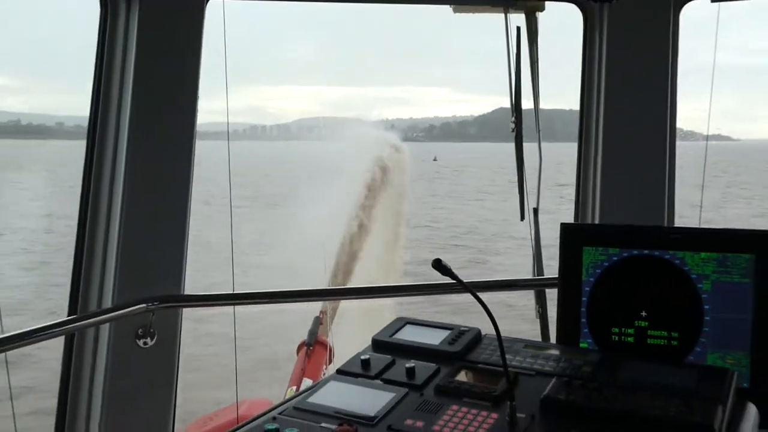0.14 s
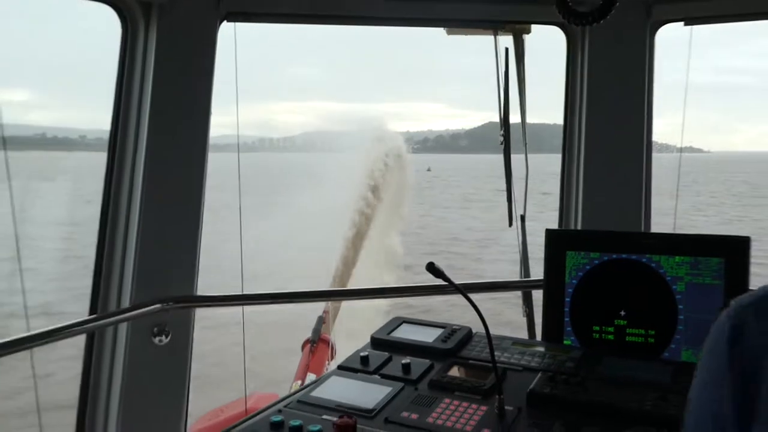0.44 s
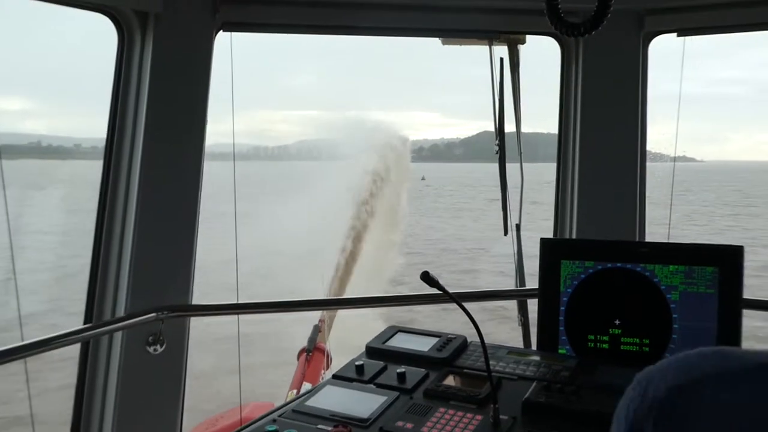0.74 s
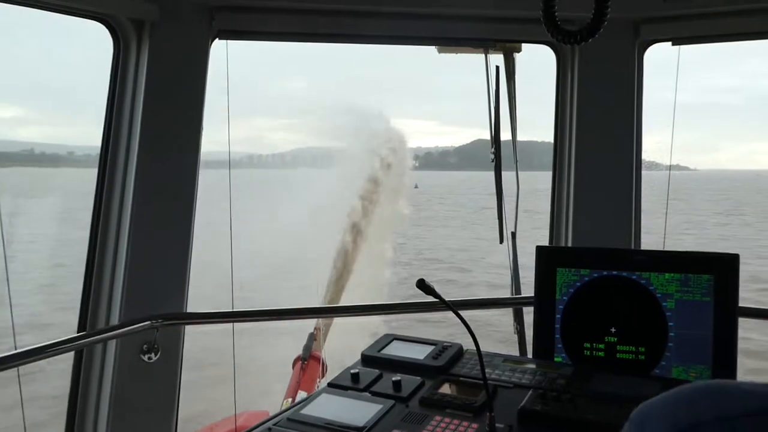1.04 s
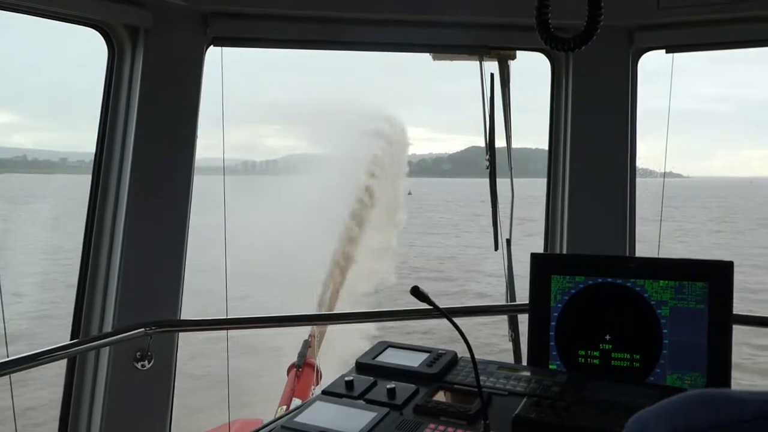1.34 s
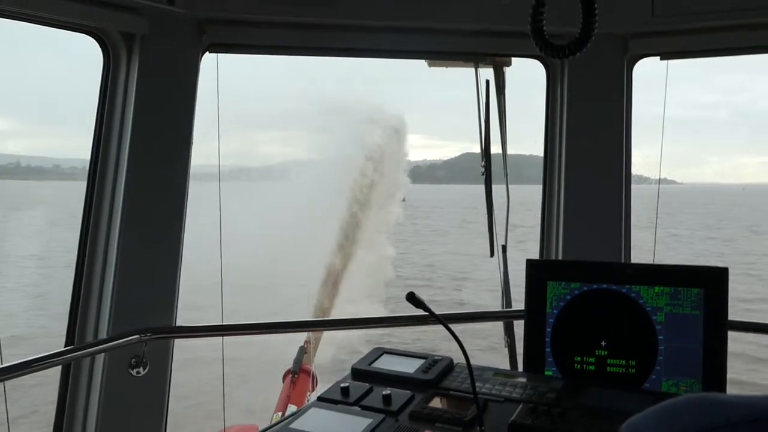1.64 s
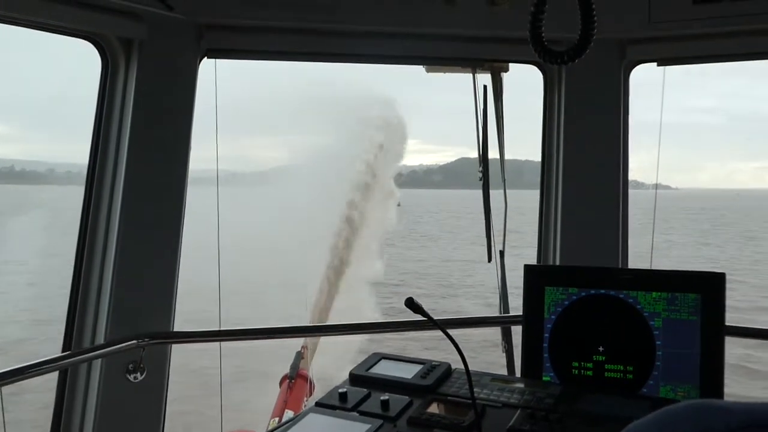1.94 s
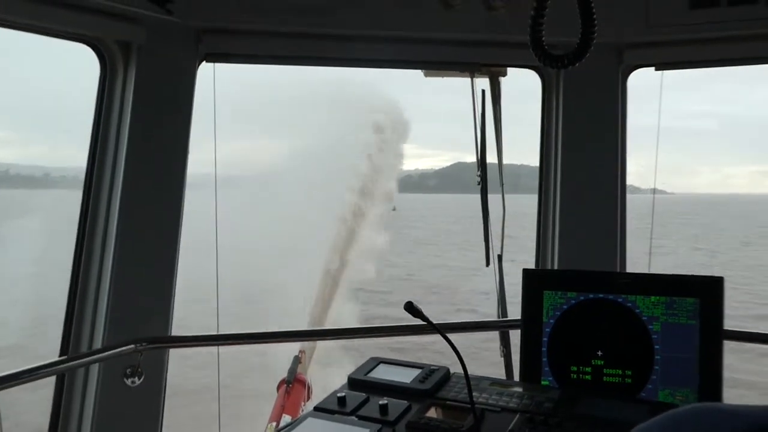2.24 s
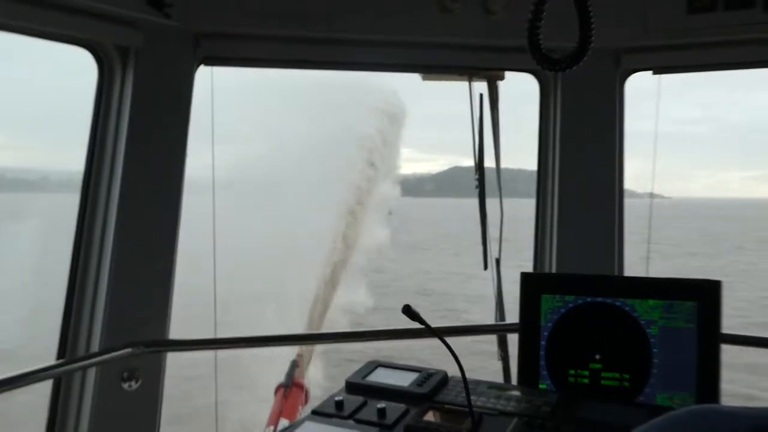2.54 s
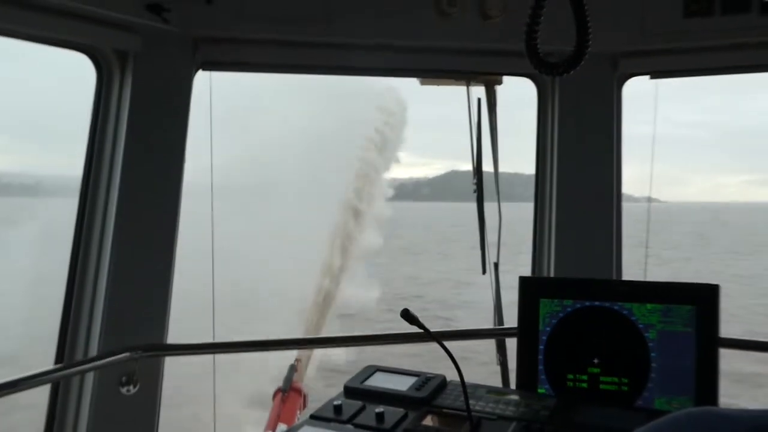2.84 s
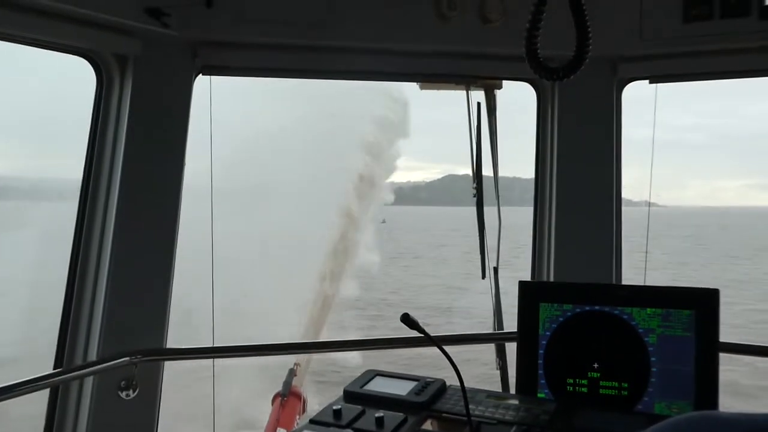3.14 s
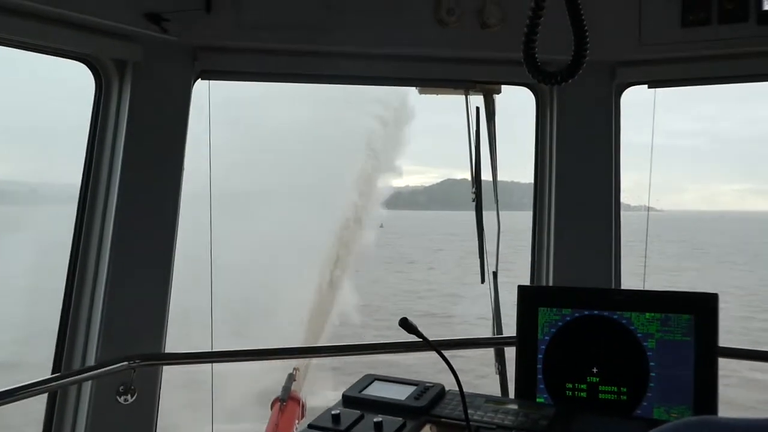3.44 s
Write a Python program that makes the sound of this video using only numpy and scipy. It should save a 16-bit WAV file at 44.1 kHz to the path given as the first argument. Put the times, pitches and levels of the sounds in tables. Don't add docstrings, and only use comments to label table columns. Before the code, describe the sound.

A boat's diesel engine drones through the cabin while water cannon spray gradually swells into a rushing roar

```python
import sys
import numpy as np
from scipy import signal
from scipy.fft import rfft, irfft, next_fast_len
from scipy.io import wavfile
from scipy.ndimage import uniform_filter1d

SR = 44100
rng = np.random.default_rng(int(sys.argv[2]) if len(sys.argv) > 2 else 0)


def how_loud(loudness_db):
    steps = np.asarray(loudness_db, float) / 20
    return 10 ** steps


def store_pcm(level_fs):
    pcm = np.round(np.clip(level_fs, -1, 1) * 32767).astype(np.int16)
    wavfile.write(sys.argv[1], SR, np.atleast_2d(pcm).T)


N = 157878
M = next_fast_len(N, real=True)
T = np.arange(N) / SR
F = np.maximum(np.arange(M // 2 + 1) * SR / M, 1)

# time_s, speed_turns_per_s
CRANK_SPEED = [(0, 14.93), (1.5, 14.9), (3.58, 14.86)]
# multiple_of_crank_speed, level_db
ENGINE_ORDERS = [(4, -55), (5, -37), (6, -35), (9, -34), (10, -53), (11, -37), (12, -32.5), (13, -42.5),
                 (22, -40.5), (36, -48)]
# frequency_hz, density_db
HULL_SPECTRUM = [(45, -10.5), (75, -13.5), (200, -0.5), (320, -4.5), (420, -3), (850, -12), (1950, -27),
                 (2250, -45)]
# time_s, change_db
HULL_STRAIN = [(0, 4), (.15, 0.5), (.5, -1), (.8, -0.5), (1.2, 1), (1.6, -1), (2.0, -1), (2.4, -0.5),
               (2.7, 1), (2.95, -5.5), (3.2, -3.5), (3.58, -7)]
# pitch_hz, level_db, full_load_change_db
PUMP_TONES = [(97.9, -41, 0.5), (105.4, -43.5, 1.5), (114.8, -47.5, 7), (201.8, -37.5, -1.5),
              (229.4, -40.5, 1), (257, -37.5, -5.5), (290, -41, -10), (348.6, -38, -9),
              (516.7, -47.5, 10.5), (570, -41.5, -2), (592, -38.5, -3.5), (615, -39, -11.5),
              (818.4, -49.5, 7), (1054, -69.5, 23)]
# start_s, length_s, start_pitch_hz, end_pitch_hz, level_db
PIPE_SURGES = [(0.4, 0.845, 240, 320, -31), (0.77, 0.617, 287, 270, -30.5), (1.05, .4, 305, 330, -31.5),
               (1.44, 0.496, 292, 270, -32), (1.5, 0.21, 200, 228, -35.5), (0.6, 1.11, 586, 592, -34.5),
               (1.4, 0.307, 615, 600, -33.5), (0, 0.16, 150, 140, -31.5), (1.24, 0.96, 512, 505, -35.5),
               (1.75, .25, 562, 558, -32.5), (2, .35, 585, 650, -35.5), (2.45, 0.356, 630, 572, -32.5),
               (2.35, 1.12, 528, 536, -35.5), (2.95, 0.236, 260, 210, -31.5), (2.9, 0.35, 560, 556, -34),
               (2.4, 0.36, 470, 466, -37), (0.37, .75, 92, 94, -30.5)]
# time_s, jet_level_db
WATER_FLOW = [(0, -50), (.63, -52), (.7, -42), (.8, -38), (1.1, -35), (1.42, -33), (1.85, -33),
              (2.1, -31.5), (2.3, -30.5), (2.5, -30), (2.7, -28.5), (2.9, -30.5), (3.2, -29), (3.58, -30)]
# frequency_hz, density_db
JET_SPECTRUM = [(330, -17.5), (560, -1), (1100, -11.5), (2500, -24), (3500, -29), (7500, -39), (10500, -45),
                (15000, -67)]
# frequency_hz, density_db
BUZZ_SPECTRUM = [(1800, 2.5), (3000, -1.5), (6000, 2), (8000, -10), (10500, -6), (13000, -21.5),
                 (15500, -14)]
# start_s, peak_db, centre_hz, decay_ms
CLICKS = [(.08255, -30, 10500, .1), (.08274, -25, 10500, .25), (.08274, -37, 14500, .2),
          (.0827, -30, 6300, .35), (.08312, -33, 10500, .5), (.0836, -40, 4500, 1.5),
          (.2045, -46, 4500, 2.0), (.2075, -43, 5000, 2.5), (.209, -40, 3900, 2.0), (.2108, -39, 4800, 2.0),
          (.209, -52, 9000, 5.0), (.214, -47, 5000, 2.0), (.598, -52, 6000, 3.0)]
# start_s, length_s, start_pitch_hz, top_pitch_hz, level_db
SQUEAKS = [
    (.36, .11, 10300, 11300, -77),
    (.46, .12, 11700, 12250, -70),
    (.41, .2, 12250, 13350, -76),
    (.3, .08, 12900, 12400, -82),
    (.33, .06, 8500, 8900, -77),
    (.51, .05, 9400, 9000, -76),
    (2.49, .2, 11950, 12200, -70),
    (2.36, .16, 12300, 12800, -75),
]
# start_s, length_s, level_db
CLOTH_STROKES = [
    (.95, 0.66, -66),
    (2.3, 0.41, -69),
    (2.85, 0.77, -65),
]
# frequency_hz, density_db
CLOTH_SPECTRUM = [(6000, -14), (8500, -7), (10200, 0), (12000, -7), (14500, -8), (16000, -12)]
# centre_hz, width_hz, gain_db
CABIN_MODES = [(111, 143, 4.5), (186, 107, -1.5), (298.6, 51, 7.5), (565, 104, 4), (768, 140, 1.5),
               (973, 215, -6.5), (1230, 750, -0.5), (1608, 210, -7), (1760, 190, -0.5)]
# frequency_hz, ratio_db
STEREO_WIDTH = [(60, -9), (200, -17.5), (700, -13.5), (1300, -10), (4400, -9), (8000, -9), (15000, -1.5)]
# frequency_hz, ratio_db
STEREO_LEAN = [(60, -0.3), (380, -2), (1300, -1.2), (4400, 0.46), (8000, -1), (14000, 1)]


def on_log(table, hz):
    points = np.array(table, float)
    return np.interp(np.log(hz), np.log(points[:, 0]), points[:, 1])


def on_time(table):
    points = np.array(table, float)
    return np.interp(T, points[:, 0], points[:, 1])


def closed(table):
    below = np.maximum(table[0][0] / F, 1)
    above = np.maximum(F / table[-1][0], 1)
    return on_log(table, F) - 24 * np.log2(below * above)


def walk(rate_hz):
    hold = int(SR / rate_hz)
    steps = np.repeat(rng.standard_normal(N // hold + 1), hold)
    wander = uniform_filter1d(uniform_filter1d(steps, hold), hold)[:N]
    return (wander - wander.mean()) / wander.std()


def stereo(mid, side):
    side = side * how_loud(on_log(STEREO_WIDTH, F))
    lean = how_loud(on_log(STEREO_LEAN, F) / 2)
    return np.array([(mid + side) * lean, (mid - side) / lean])


def tones(cycles, levels_db):
    sway_db, sway_hz = 2.8, 9
    mid = side = 0
    for cycle, db in zip(cycles, levels_db):
        size = np.sqrt(2) * how_loud(db + sway_db * walk(sway_hz))
        phase = 2 * np.pi * (cycle + rng.random()) + 0.79 * walk(8.0)
        mid = mid + size * np.sin(phase)
        side = side + size * np.cos(phase)
    return irfft(stereo(rfft(mid, M), rfft(side, M)), M)[:, :N]


def rush(colour_db, swell_db, flicker_db, flicker_hz, control, first=-1, last=17):
    noise = rfft(rng.standard_normal((2, M))) * how_loud(colour_db)
    both = stereo(*noise)
    both = both * M / np.sqrt(np.sum(np.abs(both) ** 2))
    out, swell = 0, swell_db * walk(1.62)
    for step in np.arange(first, last):
        hz = 60 * 2 ** (step / 2)
        octaves = np.log2(F / hz)
        share = np.cos(np.clip(2 * octaves, -1, 1) * np.pi / 2) ** 2
        band = irfft(both * share, M)[:, :N]
        out = out + band * how_loud(swell + flicker_db * walk(flicker_hz) + control(hz))
    return out


def engine(turns, ripple_db):
    hull_db, firing_gate_db = -24.5, 0
    strain_hz, strain_octaves = 383, 1
    gate_db = firing_gate_db * np.cos(2 * np.pi * 3 * turns)
    strain_db = on_time(HULL_STRAIN)

    def control(hz):
        weight = np.exp(-(np.log2(hz / strain_hz) / strain_octaves) ** 2)
        return hull_db + gate_db + strain_db * weight

    colour_db = closed(HULL_SPECTRUM) + ripple_db + cabin_db()
    rumble = rush(colour_db, 0.37, 0.94, 8.83, control, last=12)
    cycles = [order * turns for order, _ in ENGINE_ORDERS]
    return tones(cycles, [db for _, db in ENGINE_ORDERS]) + rumble


def pump(load):
    wobble = 0.00591
    cycles, levels_db = [], []
    for hz, db, change_db in PUMP_TONES:
        cycles.append(hz * np.cumsum(1 + wobble * walk(4.0)) / SR)
        levels_db.append(db + load * change_db)
    return tones(cycles, levels_db)


def surges():
    wobble = 0.00904
    cycles, levels_db = [], []
    for start, length, start_hz, end_hz, db in PIPE_SURGES:
        u = np.clip((T - start) / length, 0, 1)
        hz = (start_hz + (end_hz - start_hz) * u) * (1 + wobble * walk(6.0))
        cycles.append(np.cumsum(hz) / SR)
        levels_db.append(db + 10 * np.log10(np.sin(np.pi * u).clip(0) + 1e-6))
    return tones(cycles, levels_db)


def jet(flow_db, ripple_db):
    tilt = 1

    def control(hz):
        bright_db = tilt * (flow_db - flow_db.max()) * np.clip(np.log2(hz / 4000), 0, 2)
        return flow_db + bright_db

    colour_db = closed(JET_SPECTRUM) + ripple_db + 0.5 * cabin_db()
    return rush(colour_db, 0.36, 0.75, 12.0, control, first=2.58)


def buzz(ripple_db):
    buzz_db, rate_hz, pulse_db = -58.5, 9.5, 1
    throb_db = pulse_db * np.cos(2 * np.pi * rate_hz * T)
    return rush(closed(BUZZ_SPECTRUM) + ripple_db, 1.0, 1.1, 28.3, lambda hz: buzz_db + throb_db, first=8.16)


def clicks():
    out = np.zeros((2, N + 1024))
    u = np.arange(1024) / SR
    for start, db, hz, ms in CLICKS:
        chance = rng.standard_normal((2, len(u)))
        chance[:, 0] = 7 / (1 + 2 * ms ** 2), 0
        burst = chance[0] + chance[1] * np.array([[.5], [-.5]])
        burst = burst * np.exp(-u * 1000 / ms)
        edges_hz = [hz * .75, min(hz * 1.25, 19000)]
        burst = signal.sosfilt(signal.butter(2, edges_hz, "band", fs=SR, output="sos"), burst)
        i = int(start * SR)
        out[:, i:i + len(u)] += burst * how_loud(db) / np.abs(burst).max()
    return out[:, :N]


def squeaks():
    out = 0
    for start, length, start_hz, top_hz, db in SQUEAKS:
        u = np.clip((T - start) / length, 0, 1)
        hz = start_hz + (top_hz - start_hz) * np.sin(u * 1.9) + 70 * walk(90.0)
        size = np.sqrt(2) * how_loud(db + 4.4 * walk(70.0))
        swell = np.sqrt(np.sin(np.pi * u).clip(0))
        out = out + size * swell * np.sin(2 * np.pi * np.cumsum(hz) / SR)
    return out * how_loud(np.array([[1.5], [-1.5]]))


def rustle():
    rise_s, release_s = 0.046, 0.19
    envelope = 1e-4
    for start, length, db in CLOTH_STROKES:
        rise = np.clip((T - start) / rise_s, 0, 1)
        release = np.clip((start + length - T) / release_s, 0, 1)
        envelope = envelope + how_loud(db) * rise * release
    return envelope * rush(closed(CLOTH_SPECTRUM), 0.85, 0.84, 13.0, lambda hz: 0, first=11)


def cabin_db():
    return sum(db / (1 + (2 * (F - hz) / width) ** 2) for hz, width, db in CABIN_MODES)


def room_db():
    t60_s, echo_db = .12, -7
    u = np.arange(8192) / SR
    decay = np.exp(-np.log(1000) * u / t60_s)
    tail = rng.standard_normal(len(u)) * decay * (u > .002)
    echo = rfft(tail / np.sqrt(np.sum(tail ** 2)), M)
    gain = np.abs(1 + how_loud(echo_db) * echo)
    return 20 * np.log10(gain + 0.42) * np.clip(np.log2(F / 400), 0, 1)


def scene():
    crank_wobble = 0.0018
    flow_db = uniform_filter1d(on_time(WATER_FLOW), 2000)
    turns = np.cumsum(on_time(CRANK_SPEED) * (1 + crank_wobble * walk(2.997))) / SR
    load = how_loud(flow_db - flow_db.max())
    ripple_db = room_db()
    machinery = engine(turns, ripple_db) + pump(load) + surges()
    water = jet(flow_db, ripple_db)
    return machinery + water + buzz(ripple_db) + clicks() + squeaks() + rustle()


def top_cut(x):
    return signal.sosfilt(signal.butter(12, 15650, fs=SR, output="sos"), x)


def record(dry):
    lead = 2048
    low_cut_hz, top_hz, edge_s = 69.6, 15900, .004
    x = np.pad(dry, ((0, 0), (lead, 0)), mode="reflect")
    x = signal.sosfilt(signal.butter(3, low_cut_hz, "high", fs=SR, output="sos"), x)
    x = signal.sosfilt(signal.cheby2(10, 45, top_hz + 500, fs=SR, output="sos"), x)
    fade = np.sin(np.pi / 2 * np.clip(T / edge_s, 0, 1)) ** 2
    return top_cut(x[:, lead:] * fade)


dry = scene()
out = record(dry)
store_pcm(out)
```